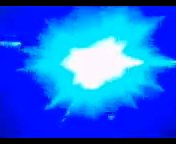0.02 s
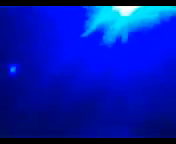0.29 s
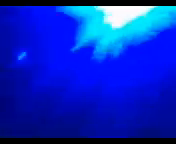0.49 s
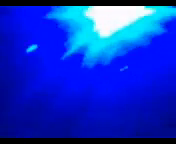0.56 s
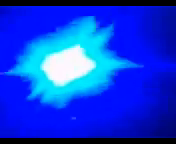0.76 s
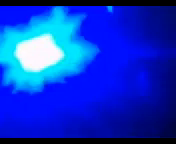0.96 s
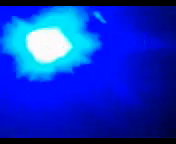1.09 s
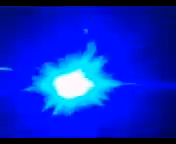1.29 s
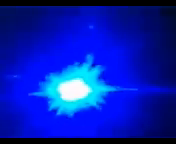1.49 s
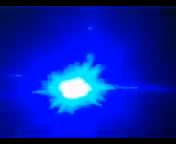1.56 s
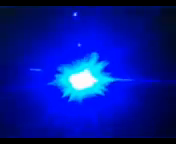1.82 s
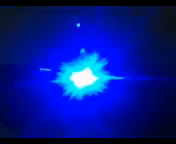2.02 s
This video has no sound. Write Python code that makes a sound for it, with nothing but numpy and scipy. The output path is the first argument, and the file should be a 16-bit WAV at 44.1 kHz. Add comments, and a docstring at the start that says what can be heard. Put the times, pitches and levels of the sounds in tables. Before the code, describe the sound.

An electric spark cracks twice, with fingers rubbing and bumping the microphone in between.

```python
"""Two sparks near a camera

Two electric sparks snap close to a small hand-held camera and overload its dull microphone.
Each is three quick jolts that ring the casing. Between them fingers bump the casing and rub it
in dense tiny slips of skin. A faint steady hiss lies underneath."""
import sys
import numpy as np
from scipy import signal
from scipy.fft import rfft, irfft
from scipy.io import wavfile
from scipy.ndimage import uniform_filter1d

SR = 44100
rng = np.random.default_rng(int(sys.argv[2]) if len(sys.argv) > 2 else 0)


def wrap_up_sound(samples):
    """Save the sound to the file named by the first command line argument, as 16-bit audio."""
    columns = np.atleast_2d(samples).T
    # keep every value between -1 and 1, then stretch to whole-number steps
    tamed = np.clip(columns, -1, 1)
    steps = np.round(tamed * 32767).astype(np.int16)
    wavfile.write(sys.argv[1], SR, steps)


N = 90404

# Hiss spectrum: freq_hz, relative_density_db
HISS_SPECTRUM = [(20, -21.5), (60, -16.5), (170, -4.5), (330, -3), (520, -5), (900, 0), (1220, -7),
                 (1600, -5), (2500, -10.5), (3450, -13), (3900, -35.5), (4800, -17.5), (5200, -84.5),
                 (9000, -100)]
# Spark jolts: start_s, level_db, polarity, body_hz, body_t60_s, bright_db, thud_db
SPARK_JOLTS = [(.2084, -19, 1, 570, 0.0071, -9, -34), (.2125, 5, 1, 439, 0.0072, -15.5, -15.5),
               (.2186, -30, 1, 386, 0.012, -6, 4.5), (1.3210, -16, -1, 640, 0.0064, -0.5, 7),
               (1.3228, 3.5, -1, 394.5, 0.0061, -7.5, -11), (1.3268, -24, 1, 513, 0.012, 10, -41)]
# Casing modes above the body note: freq_hz, gain_db, t60_s
CASING_MODES = [(824, -6.5, 0.024), (1340, -4, 0.014), (1510, 8.5, 0.0071), (1946, 5, 0.0064),
                (2580, -34.5, 0.022), (3316, -6.5, 0.0089), (4180, -3.5, 0.0036)]
# Rub envelopes: time_s, dull_db, bright_db
RUB_LEVELS = [(.21, -89, -83), (.228, -43, -91), (0.247, -38.5, -35), (0.286, -44, -62),
              (0.303, -51, -39.5), (0.323, -29, -39), (0.348, -42, -34), (.398, -40.5, -35.5),
              (0.417, -47, -63), (.5, -65, -76), (.62, -67, -52.5), (.66, -49.5, -60), (.74, -48, -55.5),
              (.765, -45, -57), (.815, -41, -52.5), (0.841, -29.5, -46), (.856, -32, -32), (.875, -35, -44),
              (.9, -40.5, -61), (.95, -56.5, -77), (0.987, -41.5, -45), (1.01, -32.5, -58),
              (1.031, -52, -49.5), (1.121, -43.5, -49.5), (1.19, -50.5, -54), (1.239, -52.5, -63),
              (1.27, -93, -81)]
# Low casing resonances: freq_hz, width_hz, gain_db
DULL_RESONANCES = [(250, 140, -11), (378, 207, -3), (580, 230, 4)]
# High casing resonances: freq_hz, width_hz, gain_db
BRIGHT_RESONANCES = [(1092, 350, -4), (1457, 150, -7), (1990, 470, -5.5), (2680, 400, -11),
                     (3230, 250, -11.5), (4860, 1800, -35)]
# Finger jolts: start_s, level_db, polarity, body_hz, body_t60_s, bright_db, thud_db
FINGER_JOLTS = [(.236, -32, 1, 560, 0.0085, -16, -22), (.248, -49, 1, 520, 0.018, -1, -13),
                (.295, -34, -1, 520, 0.018, -6, -10), (.3095, -22.5, 1, 500, 0.007, -2.5, -19.5),
                (.3168, -17, -1, 500, 0.0071, -18.5, -20), (.326, -43, -1, 560, 0.027, 4, -41),
                (.653, -44, 1, 640, 0.019, -15, -7), (.670, -40, 1, 600, 0.011, 2, -5),
                (.755, -39, 1, 620, 0.026, -20.5, -25), (.787, -37.5, 1, 570, 0.011, -7, -19),
                (.809, -42, 1, 570, 0.043, 8.5, -36), (.8258, -28, 1, 480, 0.01, -18, -26),
                (.834, -26.5, -1, 509, 0.014, -8, -7.5), (.843, -27.5, 1, 475, 0.0081, -12, -22),
                (.8515, -32.5, 1, 500, 0.011, 13.5, -2), (.856, -13, -1, 440, 0.0041, -26, -26),
                (.8628, -13.5, 1, 390, 0.01, -12.5, -9), (.879, -24.5, 1, 400, 0.0069, -6.5, -36.5),
                (.889, -29.5, 1, 410, 0.014, -5.5, -24.5), (.938, -37, -1, 340, .025, -22, -24),
                (.9572, -27.5, -1, 420, 0.0057, -24, -27.5), (.965, -41.5, -1, 380, 0.029, -13, -22),
                (.9803, -32.5, -1, 320, .035, -14, 0.5), (.9905, -29, 1, 310, 0.023, -5.5, -15.5),
                (.9968, -15.5, 1, 380, 0.0078, -20, -7), (1.2585, -35, 1, 442, 0.0079, -18, -2)]


def amp(db):
    return 10 ** (np.asarray(db) / 20)


def unit_rms(x):
    return x / np.sqrt(np.mean(x ** 2) + 1e-20)


def hiss(level_db=-46.5, patch_db=1.5):
    """Steady noise with faint patches drifting in time and frequency."""
    real, imag, patches = rng.standard_normal((N // 128 + 5, 257, 3)).T
    patches = uniform_filter1d(patches, 4, axis=0)  # across bins
    patches = unit_rms(uniform_filter1d(patches, 12, axis=1))  # across frames
    spectrogram = (real + 1j * imag) * amp(patch_db * patches)
    noise = signal.istft(spectrogram, nperseg=512, noverlap=384)[1][:N]
    freq_hz, density_db = np.transpose(HISS_SPECTRUM)
    bin_hz = np.fft.rfftfreq(N, 1 / SR)
    colour = amp(np.interp(np.log(bin_hz + 1), np.log(freq_hz), density_db))
    return amp(level_db) * unit_rms(irfft(rfft(noise) * colour, N))


def casing_ring(jolts, tilt_db_per_octave=0, tilt_above_hz=2000):
    """Each jolt rings a body note sagging in pitch, a low thud and the upper casing modes."""
    attack_s, sag_depth, sag_s, decay_power = .0008, 0.87, 0.00067, 1.923
    thud_hz, thud_t60_s = 211, 0.039
    out, t = np.zeros(N), np.arange(4000) / SR
    attack = 1 - np.exp(-t / attack_s)
    thud = amp(-60 * t / thud_t60_s) * np.sin(2 * np.pi * thud_hz * t)
    modes = np.zeros(len(t))
    for k, (freq_hz, gain_db, t60_s) in enumerate(CASING_MODES):
        tilt_db = tilt_db_per_octave * max(np.log2(freq_hz / tilt_above_hz), 0)
        modes += (-1) ** k * amp(gain_db + tilt_db - 60 * t / t60_s) * np.sin(2 * np.pi * freq_hz * t)
    for start_s, level_db, polarity, body_hz, body_t60_s, bright_db, thud_db in jolts:
        cycles = np.cumsum(body_hz * (1 + sag_depth * np.exp(-t / sag_s))) / SR
        body = amp(-60 * (t / body_t60_s) ** decay_power) * np.sin(2 * np.pi * cycles)
        ringing = 2 * body + amp(thud_db) * thud + amp(bright_db) * modes
        start = round(start_s * SR)
        out[start:start + len(t)] += polarity * amp(level_db) * attack * ringing
    return out


def sparks():
    """Sharp pressure jolts ring the casing at full brightness."""
    return casing_ring(SPARK_JOLTS)


def resonate(x, freq_hz, width_hz):
    """Unity-gain resonance."""
    carrier = np.exp(2j * np.pi * freq_hz * np.arange(len(x)) / SR)
    pole = np.exp(-np.pi * width_hz / SR)
    return 2 * (carrier * signal.lfilter([1 - pole], [1, -pole], x / carrier)).real


def finger_rub(slips_per_s=7000, spread_db=2.2):
    """Dense uneven slips of skin ring the low and high casing resonances."""
    time_s, dull_db, bright_db = np.transpose(RUB_LEVELS)
    out = np.zeros(N)
    for resonances, level_db in ((DULL_RESONANCES, dull_db), (BRIGHT_RESONANCES, bright_db)):
        slips = (rng.random(N) < slips_per_s / SR) * rng.standard_normal(N)
        slips *= amp(spread_db * np.minimum(rng.exponential(1, N), 4))
        friction = np.zeros(N)
        for k, (freq_hz, width_hz, gain_db) in enumerate(resonances):
            band = resonate(resonate(slips, freq_hz, width_hz), freq_hz, 2 * width_hz)
            friction += (-1) ** k * amp(gain_db) / np.sqrt(width_hz) * band
        envelope = amp(np.interp(np.arange(N) / SR, time_s, level_db, left=-120, right=-120))
        out += envelope * unit_rms(friction)
    return out


def finger_bumps():
    """Soft skin jolts the casing but barely wakes its highest modes."""
    return casing_ring(FINGER_JOLTS, tilt_db_per_octave=-14)


def scene():
    return (sparks() + finger_rub() + finger_bumps() + hiss())[None]


def record(dry):
    """Dull microphone, hard overload, gentle roll-off, band limit."""
    low_cut_hz, stopband_hz, clip_level, rolloff_hz, band_limit_hz = 35, 5500, .7, 3770, 16300
    thinned = signal.lfilter(*signal.butter(1, low_cut_hz, "high", fs=SR), dry)
    dull = signal.sosfilt(signal.cheby2(12, 70, stopband_hz, fs=SR, output="sos"), thinned)
    clipped = np.clip(dull, -clip_level, clip_level)
    softened = signal.lfilter(*signal.butter(1, rolloff_hz, fs=SR), clipped)
    band_limit = signal.firwin(511, band_limit_hz, window=("kaiser", 9), fs=SR)
    return signal.oaconvolve(softened, band_limit[None], "same")


dry = scene()
out = record(dry)
wrap_up_sound(out)
```